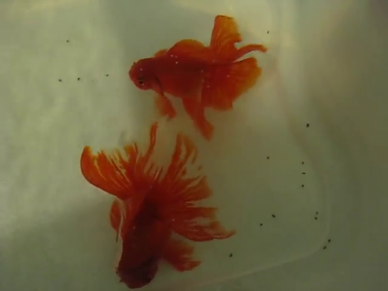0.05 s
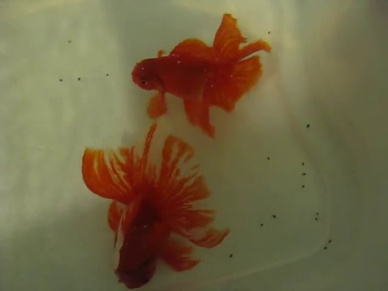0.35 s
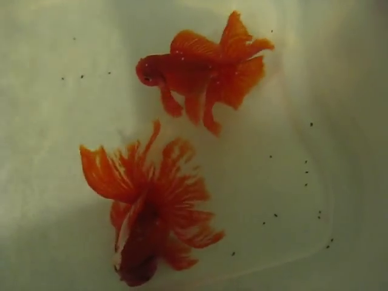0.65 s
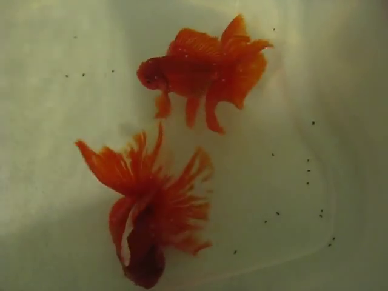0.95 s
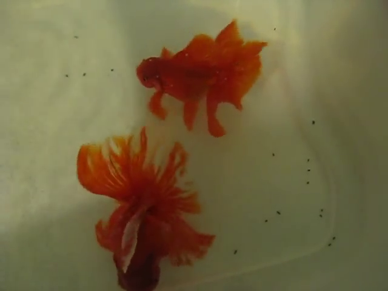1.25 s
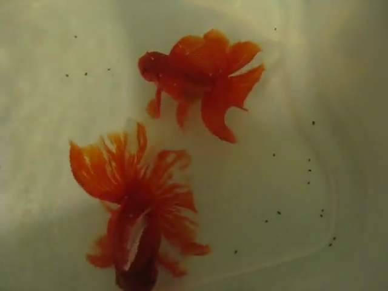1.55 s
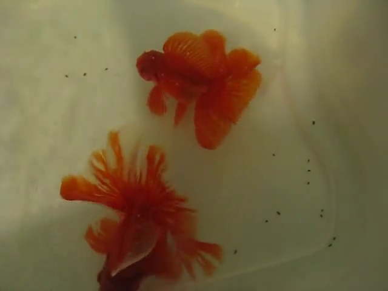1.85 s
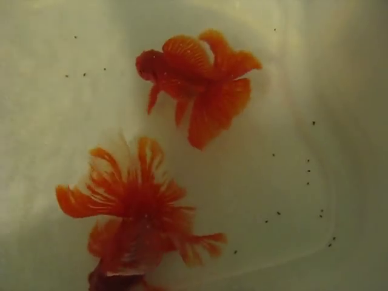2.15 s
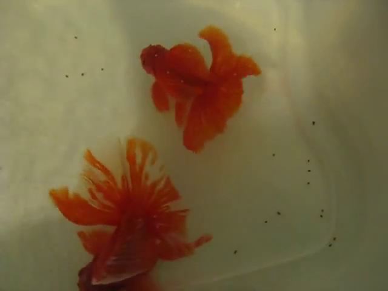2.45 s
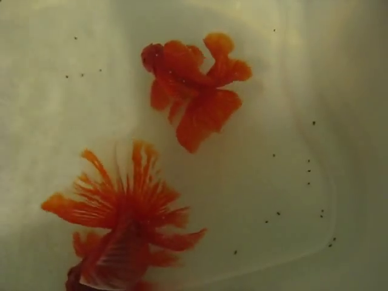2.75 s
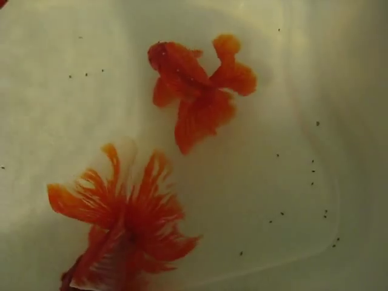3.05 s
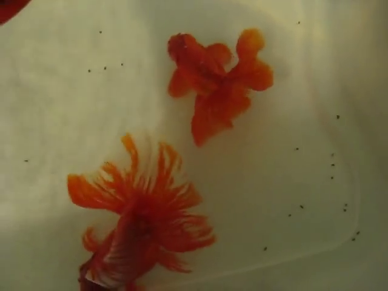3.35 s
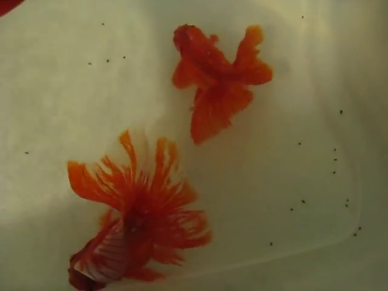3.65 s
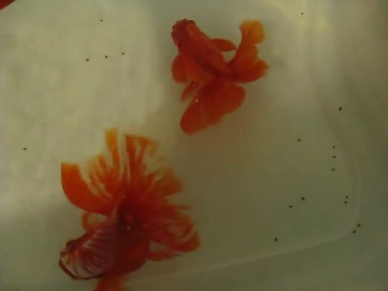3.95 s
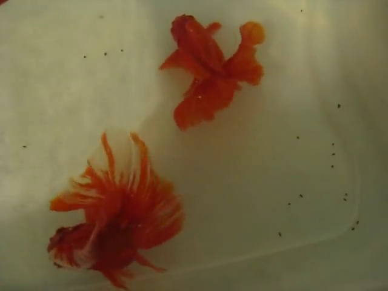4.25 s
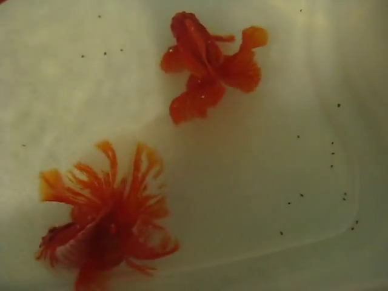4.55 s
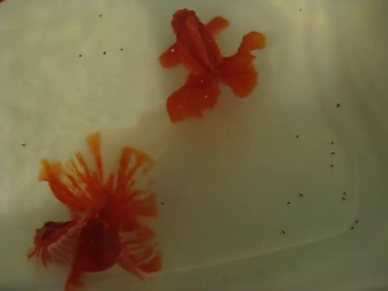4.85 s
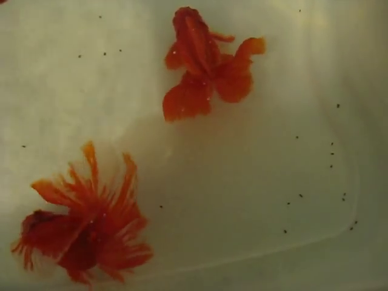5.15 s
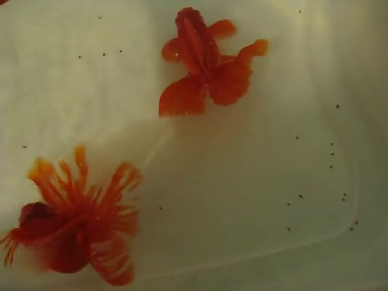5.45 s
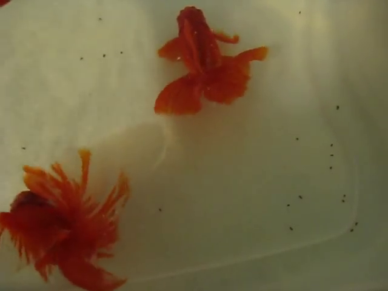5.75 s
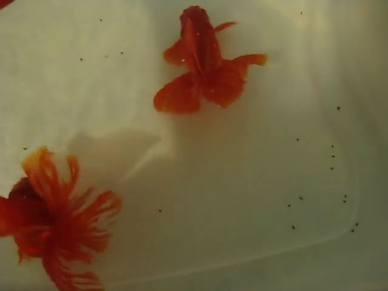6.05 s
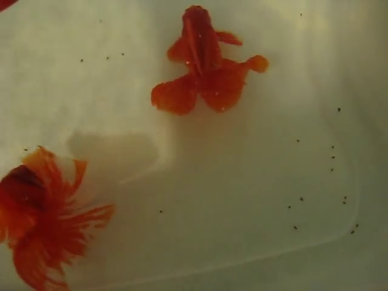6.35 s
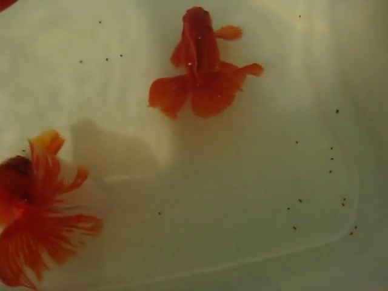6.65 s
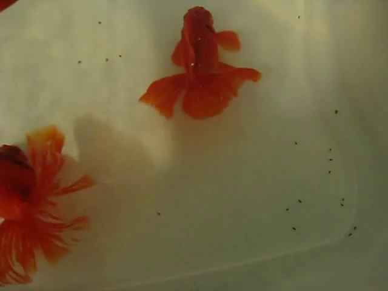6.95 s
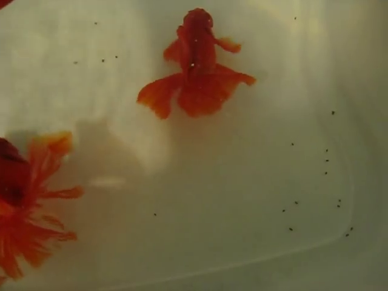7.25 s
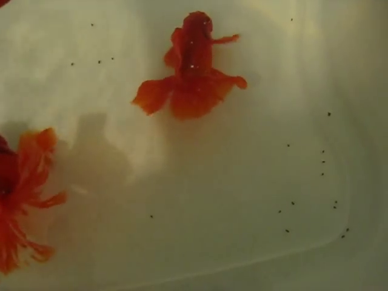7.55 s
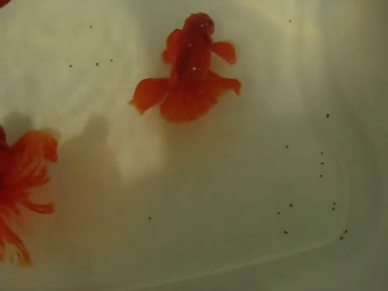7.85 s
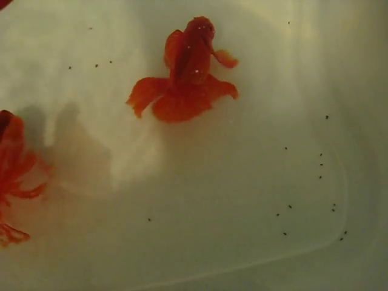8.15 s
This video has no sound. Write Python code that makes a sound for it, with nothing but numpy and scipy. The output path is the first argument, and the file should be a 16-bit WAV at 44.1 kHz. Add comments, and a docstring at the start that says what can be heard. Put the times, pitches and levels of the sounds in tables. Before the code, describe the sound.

Dense bubbling churns the water in a plastic fish tub, with a fine fizz at the surface and a few tiny pops. An air pump hums and rattles steadily under it, close to the microphone. The tub takes a few soft, low bumps, then one sharp knock and a quick run of lighter ones. The bubbling and the hum carry on unchanged to the end.

```python
"""A steady hum and rattle over dense bubbling: a mains air pump aerates a plastic fish tub, close by.
The pump taps its casing and puffs air once a stroke. The air rises as ringing bubbles that churn
the water, sound the hollows of the tub, and fizz and pop at the surface.
The tub takes a few soft bumps, then one sharp knock and a little run of lighter ones."""
import sys
import numpy as np
from scipy import signal
from scipy.fft import rfft, irfft, next_fast_len
from scipy.io import wavfile
from scipy.ndimage import uniform_filter1d

SR = 44100
rng = np.random.default_rng(int(sys.argv[2]) if len(sys.argv) > 2 else 0)


def master(y):
    """Save y as 16-bit WAV."""
    cut = np.clip(np.atleast_2d(y).T, -1, 1)
    pcm = np.round(cut * 32767)  # scale
    wavfile.write(sys.argv[1], SR, pcm.astype(np.int16))


N = 362061
MAINS_HZ, TOP_HZ = 60.014, 17100


def undb(db):
    """Decibels to gain."""
    return 10 ** (np.asarray(db) / 20)


def level(x, db):
    """Scale to an rms level."""
    return x * undb(db) / np.sqrt(np.mean(x ** 2))


def peak(x, db):
    """Scale to a peak level."""
    return x * undb(db) / np.abs(x).max()


def colour(x, points):
    """Minimum-phase EQ through (f/Hz, gain/dB) points."""
    hz, db = np.transpose(points)
    size = next_fast_len(N + SR // 4)
    size += size % 2
    f = np.maximum(np.arange(size // 2 + 1) * SR / size, 1)
    gain = undb(np.interp(np.log(f), np.log(hz), db))
    cepstrum = irfft(np.log(gain))
    cepstrum[1:size // 2] *= 2
    cepstrum[size // 2 + 1:] = 0
    return irfft(rfft(x, size) * np.exp(rfft(cepstrum)))[:N]


def band(x, hz, width_hz):
    """One resonance, gain 1 at its centre."""
    hz = min(hz, SR / 2 - 1000)
    return signal.lfilter(*signal.iirpeak(hz, hz / width_hz, fs=SR), x)


def steep_band(x, hz, width_hz):
    """Two passes through a resonance keep its skirts dark."""
    return band(band(x, hz, width_hz), hz, width_hz)


def highpass(x, hz, order=2):
    """Roll off the bass."""
    return signal.sosfilt(signal.butter(order, hz, "high", fs=SR, output="sos"), x)


def fade(t, t60):
    """Exponential decay, 60 dB down at t60."""
    return np.exp(-np.log(1000) * t / t60)


def ring(modes):
    """Response of (f/Hz, t60/s, level/dB) modes to a tap."""
    t = np.arange(SR // 8) / SR
    return sum(undb(db) * fade(t, t60) * np.sin(2 * np.pi * hz * t) for hz, t60, db in modes)


def drift(rate_hz):
    """Smooth random modulation with a spread near 1."""
    hold = int(SR / rate_hz)
    steps = np.repeat(rng.standard_normal(N // hold + 1), hold)
    return uniform_filter1d(steps, hold)[:N] * np.sqrt(3 / 2)


def taps(times, sizes):
    """Impulses at the given times."""
    return np.bincount(np.clip(times * SR, 0, N).astype(int), sizes, N + 1)[:N]


def add(out, start_s, sound):
    """Mix a sound in at a time."""
    i = max(int(start_s * SR), 0)
    out[i:i + len(sound)] += sound[:max(N - i, 0)]


def stroke(centre, width):
    """A smooth gate that opens once a pump cycle; centre and width in cycles."""
    phase = np.arange(N) / SR * MAINS_HZ
    offset = (phase - centre + .5) % 1 - .5
    return np.exp(-.5 * (offset / width) ** 2)


# ring of the pump casing: f/Hz, t60/s, relative level/dB
CASING_MODES = [(780, 0.017, -4), (1035, 0.0055, -0.5), (1150, 0.019, -12), (1290, 0.0032, -4)]
# tone of each puff of air: f/Hz, gain/dB
PUFF_EQ = [(200, -30.5), (500, -29.5), (750, -9), (1000, 0), (1170, 1), (1380, -9.5), (1600, -36),
           (2400, -28.5), (6000, -36), (16000, -62)]
# the pump's effort swells and sags, moving rattle and puff together: t/s, gain/dB
PUMP_EFFORT = [(0.0, 0.9), (2.15, -0.5), (2.45, 0.8), (2.75, -2.2), (2.85, 0), (3.3, -2.5), (3.45, 1.0),
               (4.4, 0), (6.7, 0.1), (6.95, 2.5), (7.25, -1.1), (7.4, 5), (7.55, -4.5), (8.2, 1.5)]


def pump(rattle_db=-45.5, puff_db=-44.5, scatter_db=0.6, jitter_s=0.00012, surge_db=0.2):
    """Each stroke taps the casing a little differently and pushes out a puff of air."""
    cycles = np.arange(int(N / SR * MAINS_HZ))
    late, strength = rng.standard_normal((len(cycles), 2)).T
    times = (cycles + .505) / MAINS_HZ + jitter_s * late
    hits = taps(times, undb(scatter_db * strength))
    rattle = signal.fftconvolve(hits, ring(CASING_MODES))[:N]
    rattle = steep_band(rattle, hz=1050, width_hz=900)  # the tub wall passes only the mids
    valve = stroke(0.539, 0.05) + 0.51 * stroke(0.716, 0.11)  # opens sharply, then the air trails off
    puff = colour(rng.standard_normal(N) * valve, PUFF_EQ) * undb(surge_db * drift(40))
    effort_db = np.interp(np.arange(N) / SR, *np.transpose(PUMP_EFFORT))
    return (level(rattle, rattle_db) + level(puff, puff_db)) * undb(effort_db)


# partials of the pump's hum: multiple of the mains, rms level/dB
HUM_HARMONICS = [(1, -61.5), (2, -58.5), (3, -50.5), (4, -58), (8, -55.5), (10, -60.5), (11, -56.5),
                 (15, -58), (18, -50)]


def hum(waver_db=1.0):
    """The pump's armature swings at the mains rate and shakes its harmonics into the tub."""
    phase = 2 * np.pi * MAINS_HZ * np.arange(N) / SR
    out = np.zeros(N)
    for multiple, db in HUM_HARMONICS:
        partial = np.sin(multiple * phase + rng.uniform(0, 2 * np.pi))
        out += level(partial, db) * undb(waver_db * drift(5))
    return out


def bubbles(count, centre_hz, octaves, cycles, glide, scatter_db, db):
    """Each bubble rings at a pitch set by its size and rises in pitch as it nears the surface."""
    out = np.zeros(N)
    starts = rng.uniform(0, N / SR, count)
    spreads = np.clip(rng.standard_normal((count, 2)), -2.2, 2.2)
    for start_s, (pitch, strength) in zip(starts, spreads):
        hz = min(centre_hz * 2 ** (octaves * pitch), TOP_HZ)
        life_s = cycles / hz
        t = np.arange(int(life_s * SR)) / SR
        chirp = np.sin(2 * np.pi * hz * t * (1 + glide * t / life_s / 2))
        add(out, start_s, undb(scatter_db * strength) * fade(t, life_s) * chirp)
    return level(out, db)


def stream():
    """Large bubbles burble; tiny ones tick as they break the surface."""
    burble = bubbles(3000, centre_hz=857.5, octaves=0.488, cycles=22.4, glide=.13, scatter_db=1, db=-46.5)
    ticks = bubbles(2200, centre_hz=6230, octaves=0.347, cycles=75, glide=.04, scatter_db=2, db=-58)
    return burble + ticks


# tone of the churned water: f/Hz, gain/dB
WASH_EQ = [(20, -33), (50, -25), (110, -7), (200, -11), (400, -4), (560, -12.5), (950, -2.5), (1150, 1),
           (1500, -9.5), (1900, -12), (2300, -17), (3600, -22.5), (6000, -33.5), (16000, -62)]
# hollow resonances of tub and air line: f/Hz, nominal width/Hz, rms level/dB
HOLLOW_BANDS = [(284.6, 20, -52.5), (652, 49, -54), (981, 110, -47.5), (1157, 20.5, -48),
                (1843, 114, -58.5), (2899, 63, -53.5), (3090, 65, -55.5)]


def water(wash_db=-41, churn_db=1.17, throb=.35):
    """Churned water washes on and sounds the hollows, which throb with both swings of the pump."""
    wash = colour(rng.standard_normal(N), WASH_EQ) * undb(churn_db * drift(22))
    drive = 1 + throb * (stroke(0.66, 0.093) + stroke(0.023, 0.097))
    hollows = sum(level(steep_band(rng.standard_normal(N) * drive, hz, 2.1 * width_hz), db)
                  for hz, width_hz, db in HOLLOW_BANDS)
    return level(wash, wash_db) + hollows


# ring of the plastic tub wall: f/Hz, t60/s, relative level/dB
WALL_MODES = [(606, 0.015, -14), (860, 0.0041, 3.5), (970, 0.059, -19.5), (1090, 0.019, -12),
              (1383, 0.033, -11.5), (1770, 0.0042, 1.5), (3550, 0.0044, -9.5), (6030, .004, -16),
              (8400, .004, -26)]
# knocks on the tub: t/s, peak level before the low cut/dB, contact/ms
KNOCK_CUES = [(2.8090, 0.9, 0.29), (3.1806, -14, 0.76), (3.1838, -21, .4), (3.2355, -21, 1),
              (3.2591, -22, .04)]


def knocks(low_hz=380, bounce_s=0.0039, bounce_db=-20, hollow_hz=545, hollow_t60=.035, hollow_db=-27.5):
    """Short pushes on the water-damped wall, duller with longer contact; the tub answers hollowly."""
    out, t = np.zeros(N), np.arange(SR // 100) / SR
    wall = highpass(ring(WALL_MODES), low_hz)
    hollow = band(ring([(hollow_hz, hollow_t60, 0)]), hollow_hz, hollow_hz)
    for start_s, db, contact_ms in KNOCK_CUES:
        push = t ** 2 * fade(t, contact_ms / 1000)
        knock = peak(np.convolve(wall, push), db)
        add(out, start_s, knock)
        add(out, start_s, peak(hollow, hollow_db + 0.29 * db))  # drops far less than the knock does
        add(out, start_s + bounce_s, undb(bounce_db) * knock)  # the wall bounces back and knocks once more
    return highpass(out, low_hz / 2)  # the small wall radiates almost no bass


# soft bumps on the tub: centre t/s, envelope peak level/dB, f/Hz
BUMP_CUES = [(1.635, -37, 103), (1.732, -38, 88), (2.06, -36.5, 115), (2.34, -45, 110)]


def bumps(swell_cycles=0.87):
    """Soft contacts set the whole tub swinging for a few cycles."""
    out, t = np.zeros(N), np.arange(N) / SR
    for centre_s, db, hz in BUMP_CUES:
        cycles = (t - centre_s) * hz
        swell = np.exp(-.5 * (cycles / swell_cycles) ** 2)
        out += undb(db) * swell * np.sin(2 * np.pi * cycles)
    return out


# tone of the surface hiss: f/Hz, gain/dB
FIZZ_EQ = [(1500, -21.5), (3000, 0), (4100, -0.5), (4800, -2.5), (6000, -0.5), (7000, -1), (9700, -5.5),
           (12500, -8), (14500, -8.5), (17000, -10)]


def fizz(spurts=420, hiss_db=-51.0, spray_db=-61.5, flicker_db=0.9, scatter_db=2.5, spurt_t60=0.036):
    """Countless tiny bubbles burst as a hiss; clusters of them go off in short, high spurts."""
    hiss = colour(rng.standard_normal(N), FIZZ_EQ) * undb(flicker_db * drift(35))
    sizes = undb(scatter_db * np.minimum(rng.exponential(size=spurts), 4))
    onsets = taps(rng.uniform(0, N / SR, spurts), sizes ** 2)
    tail = fade(np.arange(SR // 10) / SR, spurt_t60)
    power = np.abs(signal.fftconvolve(onsets, tail ** 2)[:N])  # overlapping spurts add in power
    spray = band(rng.standard_normal(N) * np.sqrt(power), hz=13000, width_hz=6000)
    return level(hiss, hiss_db) + level(spray, spray_db)


# small bubbles bursting up close: t/s, peak level of the ring/dB, f/Hz
POP_CUES = [(.1685, -37, 14500), (.398, -39, 10100), (3.055, -31, 9400), (4.121, -37, 13500),
            (4.2812, -33.5, 12400), (5.168, -40, 11000), (6.34, -34, 3800)]


def pops(relative_width=0.17, loud_db=-32, loud_t60=.036, crack_db=-16, crack_t60=.012):
    """A film of water cracks and leaves a brief high ring, longer when stronger."""
    out, t = np.zeros(N), np.arange(SR // 16) / SR
    for start_s, db, hz in POP_CUES:
        t60 = loud_t60 * 2 ** ((db - loud_db) / 2)  # halves for every 2 dB weaker
        ping_noise, crack_noise = rng.standard_normal((2, len(t)))
        ping = steep_band(ping_noise * fade(t, t60), hz, relative_width * hz)
        crack = band(crack_noise * fade(t, crack_t60), hz, hz)
        add(out, start_s, peak(ping, db) + peak(crack, db + crack_db))
    return out


def scene():
    """Pump, water and tub at one microphone."""
    return (hum() + pump() + stream() + water() + fizz() + pops() + knocks() + bumps())[None]


def record(dry, low_hz=25):
    """The microphone drops the deepest bass and the recorder cuts the top."""
    top_cut = signal.ellip(12, .1, 80, TOP_HZ, fs=SR, output="sos")
    return signal.sosfilt(top_cut, highpass(dry, low_hz, order=1))


dry = scene()
out = record(dry)
master(out)
```